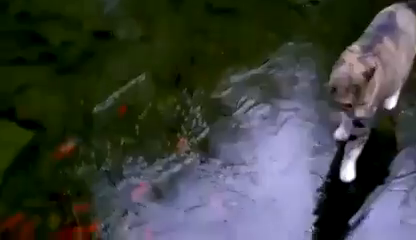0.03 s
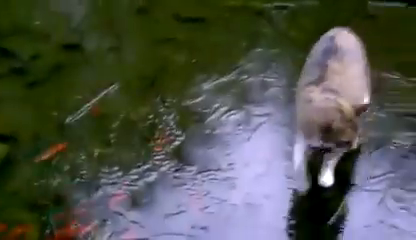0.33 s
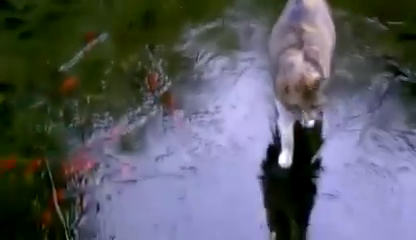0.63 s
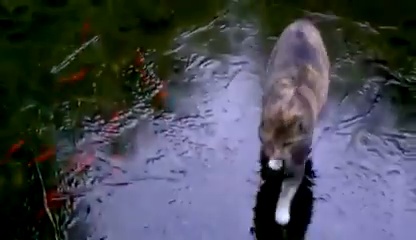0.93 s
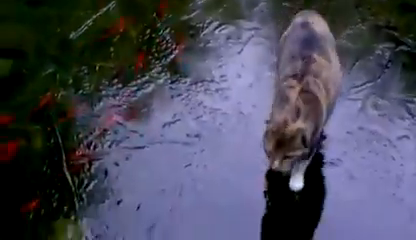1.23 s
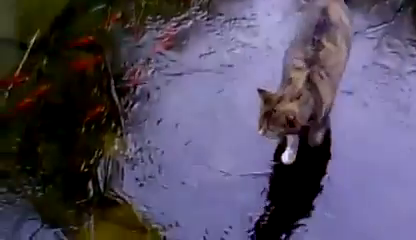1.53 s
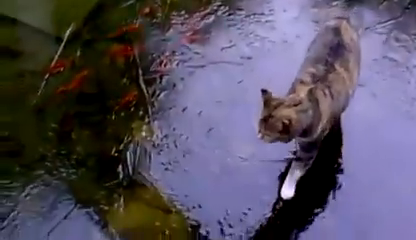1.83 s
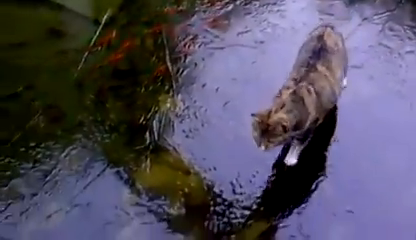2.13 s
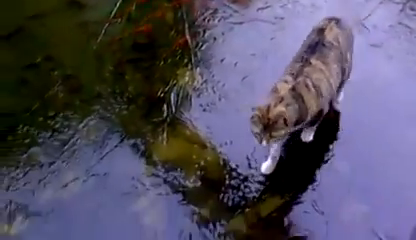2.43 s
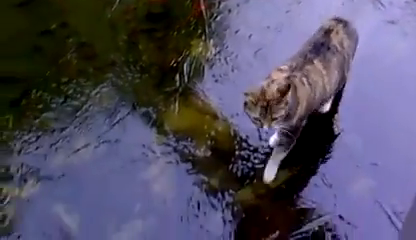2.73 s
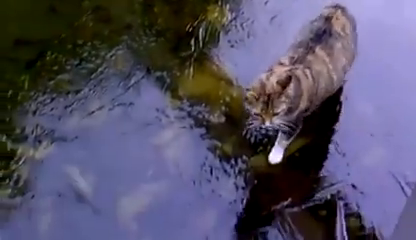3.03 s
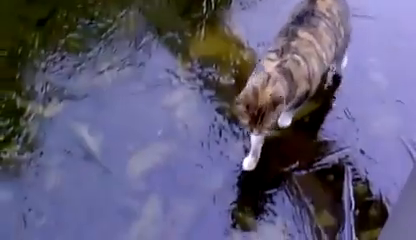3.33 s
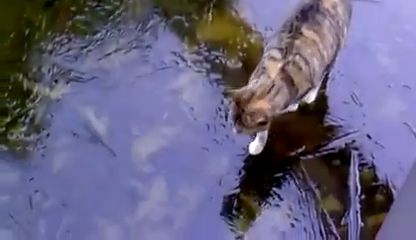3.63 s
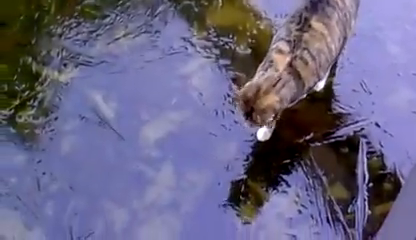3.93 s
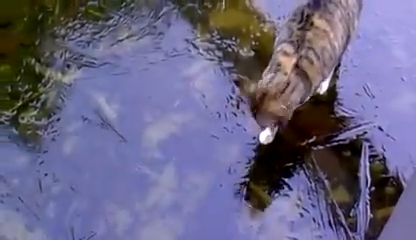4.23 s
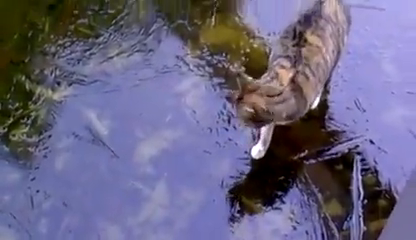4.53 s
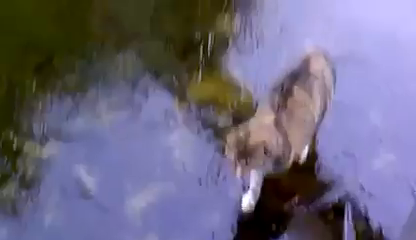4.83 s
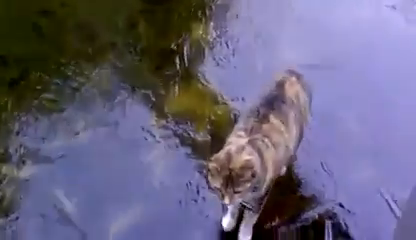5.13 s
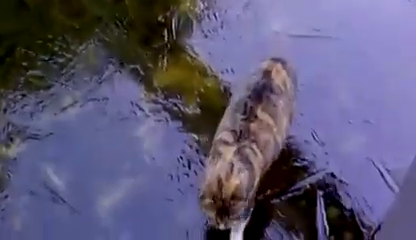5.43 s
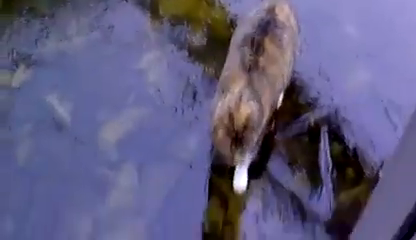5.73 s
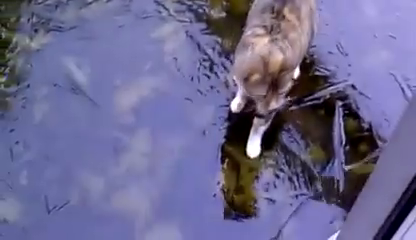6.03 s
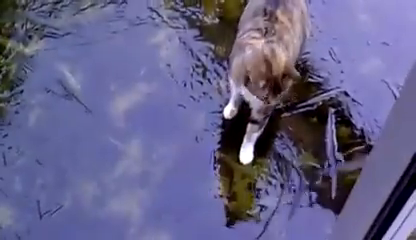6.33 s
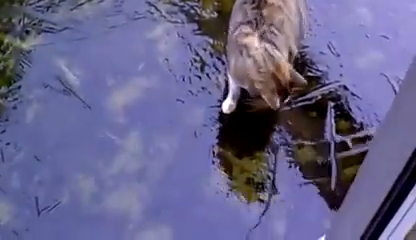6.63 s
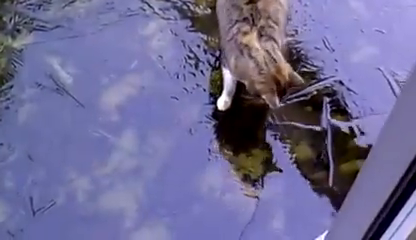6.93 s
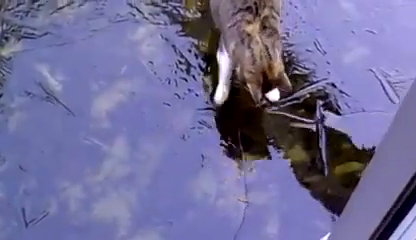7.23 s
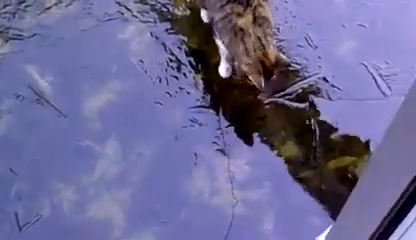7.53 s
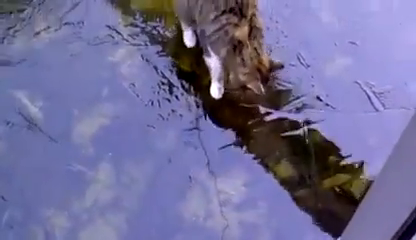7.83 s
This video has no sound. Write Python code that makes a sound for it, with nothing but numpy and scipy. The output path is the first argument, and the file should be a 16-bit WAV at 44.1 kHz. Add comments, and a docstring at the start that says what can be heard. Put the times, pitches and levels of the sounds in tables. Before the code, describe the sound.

A cat meows four times outdoors over faint air, and thin ice cracks sharply during the last, loudest meow.

```python
"""A frozen garden pond. A cat walks over it and meows four times: its vocal folds start raspy, then lock
into a clear arch of pitch while the mouth resonance sinks from "ee" to a closed hum, flaring on the way.
During the last meow the thin ice splits in two surges of tiny fractures, with a sharp zing and a
settling tail. Small ticks and paw scuffs come from the ice; faint air and a low drone lie underneath."""
import sys
import numpy as np
from scipy import signal
from scipy.fft import rfft, irfft, next_fast_len
from scipy.io import wavfile
from scipy.ndimage import uniform_filter1d

SR = 44100
rng = np.random.default_rng(int(sys.argv[2]) if len(sys.argv) > 2 else 0)


def digitize_waveform(pressure):
    """Quantize a signal to 16-bit integers and store it at the path in sys.argv[1].

    Rows of a 2-D input are taken as channels; values are limited to [-1, 1].
    """
    field = np.atleast_2d(pressure).T
    bounded = np.clip(field, -1, 1)
    quanta = np.round(bounded * 32767).astype(np.int16)
    wavfile.write(sys.argv[1], SR, quanta)


N = 355887
TIME = np.arange(N) / SR

# Contour of each meow:
# (time [s], pitch [Hz], mouth level [dB], mouth resonance [Hz], fundamental [dB], overtones [dB])
MEOW_1 = [(0.513, 852, -87, 2660, -83, -86), (0.599, 920, -71, 2160, -70, -73),
          (0.649, 917, -55, 2370, -56, -68), (0.687, 888, -58, 2110, -68, -63),
          (0.752, 924, -53, 1840, -57, -64), (0.8, 837, -47, 1350, -64, -62),
          (0.832, 823, -40, 1330, -64, -60), (0.855, 848, -60, 1640, -62, -61),
          (0.89, 864, -65, 1540, -53, -69), (0.971, 811, -57, 1780, -62, -68),
          (1.029, 856, -75, 1480, -55, -78), (1.055, 920, -81, 1400, -75, -72),
          (1.095, 870, -83, 1400, -79, -66), (1.162, 863, -85, 1400, -86, -80)]
MEOW_2 = [(1.784, 610, -72, 2330, -82, -74), (1.83, 800, -63, 2280, -74, -62),
          (1.925, 911, -59, 2200, -60, -64), (1.961, 967, -60, 2580, -68, -65),
          (2.043, 946, -60, 2730, -63, -62), (2.08, 941, -55, 2040, -62, -67),
          (2.183, 969, -72, 1990, -73, -84)]
MEOW_3 = [(2.95, 554, -69, 2320, -84, -76), (3.004, 691, -52, 2500, -66, -60),
          (3.037, 884, -55, 2960, -62, -63), (3.099, 948, -53, 3800, -59, -67),
          (3.16, 932, -49, 3200, -55, -61), (3.228, 889, -53, 2160, -58, -59),
          (3.257, 818, -45, 2100, -51, -54), (3.305, 743, -41, 1700, -51, -52),
          (3.332, 734, -28, 1400, -42, -47), (3.362, 772, -48, 1750, -53, -55),
          (3.418, 819, -61, 1580, -42, -72), (3.54, 813, -71, 1640, -55, -67),
          (3.66, 778, -74, 2150, -62, -70), (3.739, 743, -64, 2250, -60, -72),
          (3.788, 817, -67, 2110, -61, -85), (3.825, 840, -85, 1840, -77, -92)]
MEOW_4 = [(5.283, 674, -75, 2350, -82, -83), (5.294, 655, -53, 2020, -74, -66),
          (5.324, 690, -48, 2350, -59, -54), (5.368, 915, -54, 3150, -61, -64),
          (5.442, 868, -54, 2980, -70, -59), (5.489, 823, -47, 1650, -53, -55),
          (5.54, 793, -46, 1750, -55, -62), (5.556, 775, -26, 1380, -50, -48),
          (5.571, 780, -42, 1500, -54, -51), (5.599, 783, -49, 1620, -51, -54),
          (5.635, 768, -45, 1400, -33, -64), (5.75, 774, -70, 1400, -62, -79)]
# Character of each meow: (rasp length [s], subharmonic depth [0-1], upper resonance at usual pitch [Hz])
MEOW_CHARACTERS = [(.029, .3, 4600), (.1, .8, 4850), (.105, .55, 4550), (.115, .25, 4250)]
# EQ of the background noise that swells with the voice: (frequency [Hz], level [dB])
NOISE_SWELL_EQ = [(30, 2.5), (70, 12), (150, 0.5), (500, 0.5), (1500, -4.5), (4000, -2.5), (7000, -12),
                  (10000, -24.5)]

def cat(noise_swell_db=-14, noise_swell_growth=.74, usual_db=-48):
    """Four meows, with background noise that swells and sinks with their loudness."""
    contours = MEOW_1, MEOW_2, MEOW_3, MEOW_4
    voice = sum(meow(contour, *character) for contour, character in zip(contours, MEOW_CHARACTERS))
    power = np.maximum(uniform_filter1d(voice ** 2, size=2000), 0)
    loudness = np.sqrt(power) / from_db(usual_db)
    noise_gain = from_db(usual_db + noise_swell_db) * loudness ** noise_swell_growth
    return voice + noise_gain * noise(NOISE_SWELL_EQ)


def meow(contour, rasp_s, subharmonic, upper_hz, creak_db=-15):
    """The vocal folds beat unevenly at first, then lock into a clear tone."""
    span = (TIME >= contour[0][0]) & (TIME <= contour[-1][0])
    t = TIME[span]
    pitch, mouth_db, mouth_hz, fundamental_db, overtones_db = automation(contour, t)
    rasp = 1 / (1 + ((t - t[0]) / rasp_s) ** 6)
    jitter = (.007 + .005 * rasp) * drift(170, len(t))
    phase = 2 * np.pi * np.cumsum(pitch * (1 + jitter)) / SR
    overtones = vocal_tract(pitch, rasp, upper_hz, mouth_db, mouth_hz, overtones_db)
    tone = 0
    for k, gain in enumerate([from_db(fundamental_db), *overtones], 1):
        shimmer = 1 + (.12 + .045 * k + .25 * rasp) * drift(110, len(t))
        tone = tone + np.sqrt(2) * gain * shimmer * np.sin(k * phase)
    # loose folds alternate strong and weak cycles, each letting a turbulent puff into the throat
    growl = subharmonic * rasp
    tone = tone * (1 + growl * np.cos(phase / 2)) / np.sqrt(1 + growl ** 2)
    puffs = rng.standard_normal(len(t)) * (1 + np.cos(phase))
    creak = unit_rms(ring(puffs, hz=2900, width_hz=1700))
    out = np.zeros(N)
    out[span] = gate(t) * (tone + rasp * from_db(creak_db + mouth_db) * creak)
    return out


def vocal_tract(pitch, rasp, upper_hz, mouth_db, mouth_hz, overtones_db, usual_pitch_hz=850):
    """Gains of harmonics 2-11: the moving mouth picks out one or two, higher resonances carry the top."""
    hz = np.arange(2, 12)[:, None] * pitch
    flutter = from_db([1.8 * drift(14, len(pitch)) for _ in hz])
    mouth = bell(hz, mouth_hz, width_hz=.38 * mouth_hz)
    nose = from_db(-4) * bell(hz, 3250, width_hz=450)
    # the upper resonance partly tracks the pitch and sits lower during the rasp
    centre_hz = upper_hz * (pitch / usual_pitch_hz) ** .4 * (1 - .33 * rasp)
    upper = bell(hz, centre_hz, width_hz=1150) + nose
    mouth_gains = from_db(mouth_db) * unit_power(mouth * flutter)
    upper_gains = from_db(overtones_db) * unit_power(upper * flutter)
    return np.hypot(mouth_gains, upper_gains)


# EQ of the crack's three layers: (frequency [Hz], level [dB])
BODY_EQ = [(40, -8.5), (150, -2.5), (350, -7.5), (700, -1), (1200, -4), (2000, 1), (2950, 1.5), (3300, -23)]
CRUNCH_EQ = [(2700, -40.5), (3020, -16.5), (3150, -5.5), (3450, -1), (3900, -3.5), (4350, -1.5),
             (5000, -7.5), (5600, -23)]
SPLINTER_EQ = [(4600, -24.5), (5300, -2), (5900, -2), (6450, 2), (7100, -7), (7800, -8), (9100, -18.5),
               (10000, -28.5)]
# Their envelopes: (level [dB], lag [s], attack [s], release [dB/s], relative tail [dB], tail fall [dB/s])
BODY_ENV = (-30.7, -.001, .003, 240, -17, 110)
CRUNCH_ENV = (-17.3, .003, .011, 310, -21, 72)
SPLINTER_ENV = (-22.5, .001, .004, 290, -19, 88)

def crack():
    """The split runs through the sheet: body and splinters lead, the crunch follows."""
    layers = (BODY_ENV, BODY_EQ), (CRUNCH_ENV, CRUNCH_EQ), (SPLINTER_ENV, SPLINTER_EQ)
    return sum(surges(*envelope) * equalise(fractures(), eq) for envelope, eq in layers)


# Surges of the running crack: (time [s], relative level [dB], hold [s])
SURGES = [(5.610, 0, .021), (5.683, -8.5, .036)]

def surges(level_db, lag_s, attack_s, release_db_per_s, tail_db, tail_db_per_s):
    """Each surge rises, holds and dies quickly, leaving a slower tail as the ice settles."""
    power = 0
    for s, db, hold_s in SURGES:
        age = TIME - s - lag_s
        attack = np.clip(age / attack_s, 0, 1)
        released_s = np.clip(age - hold_s, 0, 2)
        fall = from_db(-release_db_per_s * released_s) + from_db(tail_db - tail_db_per_s * released_s)
        power = power + (from_db(db) * attack * fall) ** 2
    return from_db(level_db) * np.sqrt(power) / (1 + from_db(tail_db))


def fractures(per_s=7000, spread_db=2):
    """A dense crackle of tiny breaks of unequal size."""
    sizes = from_db(spread_db * np.minimum(rng.exponential(1, N), 4))
    polarity = rng.choice([-1, 1], N)
    return sizes * polarity * (rng.random(N) < per_s / SR)


# Long fractures zinging through the sheet: (time [s], peak [dB], start pitch [Hz], glide [s], attack [s])
ZINGS = [(5.6146, -3.8, 6870, 0.043, .0013), (5.6595, -17.5, 9300, .019, .003),
         (5.689, -17, 7770, .036, .003)]

def zings(grain=.29):
    """High bending waves outrun low ones in ice, so a fracture arrives as a quick falling whistle."""
    out = np.zeros(N)
    t = TIME[:SR // 20]
    for s, db, top_hz, glide_s, attack_s in ZINGS:
        phase = 2 * np.pi * np.cumsum(top_hz / (1 + t / glide_s) ** 2) / SR
        envelope = t * np.exp(-t / attack_s)
        grit = 1 + grain * drift(1200, len(t))
        place(out, envelope * np.sin(phase) * grit, s, db)
    return out


# Single fractures, ticks and paw scuffs: (time [s], peak [dB], centre [Hz], width [Hz], burst T60 [s])
SNAPS = [(.5950, -56, 5500, 2000, .01), (.6264, -32.5, 5600, 2800, 0.0058),
         (.6267, -37.5, 1980, 2200, 0.017), (1.738, -64, 90, 120, 0.053), (2.813, -44.5, 1980, 1200, 0.14),
         (4.610, -44.5, 600, 250, .05), (4.611, -51, 1120, 300, .05), (5.11, -55, 3800, 900, 0.24),
         (5.618, -13, 7100, 1090, .02), (5.6265, -8.5, 3630, 700, 0.034), (5.6325, -12, 3500, 700, .014),
         (5.639, -8, 4150, 1190, 0.014), (5.6635, -13, 6000, 1200, 0.011), (5.856, -45, 6200, 1480, 0.011),
         (5.9175, -36.5, 6800, 597, 0.011), (5.929, -43.5, 3670, 603, .03), (6.759, -53, 820, 700, 0.063),
         (8.04, -54.5, 470, 600, 0.055)]

def snaps():
    """Each snap is a short dying burst that rings a patch of ice."""
    out = np.zeros(N)
    for s, db, hz, width_hz, t60 in SNAPS:
        place(out, ring(burst(t60, length_s=.25), hz, width_hz), s, db)
    return out


# Soft strokes on the ice: (crest time [s], half length [s], level [dB])
SCRAPES = [(6.75, .35, -67), (7.6, .5, -71)]
# Their EQ: (frequency [Hz], level [dB])
SCRAPE_EQ = [(3200, -14), (4400, 0), (5600, -12)]

def scrapes():
    """Fine grains of ice rubbed in slow, soft strokes."""
    strokes = sum(from_db(db) * swell(s, half_s) for s, half_s, db in SCRAPES)
    return strokes * equalise(fractures(), SCRAPE_EQ)


# EQ of the air bed's low rush and thin hiss: (frequency [Hz], level [dB])
RUSH_EQ = [(25, -10), (45, -4.5), (66, 0.5), (82, -6.5), (100, -3.5), (160, -8), (256, -9.5), (444, -10.5),
           (640, -12.5), (1100, -12.5), (1300, -15.5), (2000, -15.5), (3200, -28.5)]
HISS_EQ = [(1530, -29.5), (2600, -5), (3190, -4), (4410, -3.5), (7100, -7.5), (8760, -13.5), (9590, -21),
           (10100, -33), (13100, -51), (22000, -120)]
# Slow swells of the bed: (crest time [s], half length [s], rush lift [dB], hiss lift [dB])
AIR_SWELLS = [(.72, .18, 4.5, 3.5), (1.9, .2, 2.5, 1.5), (3.42, .27, 6, 3.7), (5.78, .21, 10, 3.5),
              (6.78, .42, 1, 5.6), (8.0, .7, 1.7, 4.2)]

def air(rush_db=-61.4, hiss_db=-69.5, drone_db=-11.5, full_at_s=.63, fade_db_per_s=100):
    """A distant outdoor rush with a low drone in it, and a swishing hiss; both fade in and swell."""
    for s, half_s, rush_lift_db, hiss_lift_db in AIR_SWELLS:
        rush_db = rush_db + rush_lift_db * swell(s, half_s)
        hiss_db = hiss_db + hiss_lift_db * swell(s, half_s)
    drone = unit_rms(ring(rng.standard_normal(N), hz=72, width_hz=16))
    swish_db = .7 * drift(10, N)
    hiss = from_db(hiss_db + swish_db) * noise(HISS_EQ)
    rush = from_db(rush_db) * (noise(RUSH_EQ) + from_db(drone_db) * drone)
    fade_in = from_db(fade_db_per_s * np.minimum(TIME - full_at_s, 0))
    return fade_in * (rush + hiss)


# Early reflections off the ice and the pond edge: (delay [s], level [dB])
ECHOES = [(.017, -18.5), (.034, -23), (.058, -23.5)]

def garden(x, tail_db, tail_t60):
    """Open-air space: a few weak echoes and a short scattered tail."""
    tail = burst(tail_t60, length_s=.5)
    wet = signal.fftconvolve(x, tail / np.linalg.norm(tail))[:N]
    echoes = sum(from_db(db) * np.interp(TIME - delay, TIME, x, left=0) for delay, db in ECHOES)
    return x + echoes + from_db(tail_db) * wet


def from_db(db):
    """Decibels to gain."""
    return 10 ** (np.asarray(db) / 20)


def unit_rms(x):
    """Normalise to rms 1."""
    return x / np.sqrt(np.mean(x ** 2) + 1e-20)


def unit_power(gains):
    """Scale harmonic gains so that their powers add up to 1."""
    return gains / np.sqrt(np.sum(gains ** 2, axis=0))


def automation(rows, t):
    """Each lane of a breakpoint table at the times t."""
    times, *lanes = np.transpose(rows)
    return [np.interp(t, times, lane) for lane in lanes]


def gate(t, fade_s=.004):
    """Open across t, with a short fade at each end."""
    return np.clip(np.minimum(t - t[0], t[-1] - t) / fade_s, 0, 1)


def swell(crest_s, half_s):
    """A smooth rise and fall, 1 at the crest."""
    return np.exp(-((TIME - crest_s) / half_s) ** 2)


def drift(rate_hz, size):
    """Random modulation up to about rate_hz; rms 1."""
    hz = np.fft.rfftfreq(size, 1 / SR)
    return unit_rms(irfft(rfft(rng.standard_normal(size)) / (1 + (hz / rate_hz) ** 2), size))


def equalise(x, eq):
    """Shape a steady source with an EQ curve that rolls off past its ends; rms 1."""
    size = next_fast_len(N)
    hz = np.maximum(np.fft.rfftfreq(size, 1 / SR), 1)
    points, db = np.transpose(eq)
    curve = from_db(np.interp(np.log(hz), np.log(points), db))
    skirts = np.minimum(1, np.minimum(hz / points[0], points[-1] / hz)) ** 8
    return unit_rms(irfft(rfft(x, size) * curve * skirts, size)[:N])


def noise(eq):
    """Steady noise through an EQ curve."""
    return equalise(rng.standard_normal(N), eq)


def burst(t60, length_s):
    """A noise hit that falls 60 dB in t60 seconds."""
    t = TIME[:round(length_s * SR)]
    return rng.standard_normal(len(t)) * from_db(-60 * t / t60)


def ring(x, hz, width_hz):
    """Two resonators in series, the second twice as wide."""
    for width in width_hz, 2 * width_hz:
        r = np.exp(-np.pi * width / SR)
        poles = [1, -2 * r * np.cos(2 * np.pi * hz / SR), r * r]
        x = signal.lfilter(np.array([1, 0, -1]) * (1 - r * r) / 2, poles, x)
    return x


def bell(hz, centre_hz, width_hz):
    """Gain of a resonance, 1 at its centre."""
    return 1 / (1 + ((hz - centre_hz) / width_hz) ** 2) ** 2


def place(track, hit, at_s, peak_db):
    """Mix a hit into the track at a given time and peak level."""
    start = round(at_s * SR)
    track[start:start + len(hit)] += (from_db(peak_db) * hit / np.abs(hit).max())[:N - start]


def scene():
    """Mono mix: cat and ice in the garden, over the air bed and soft scrapes."""
    voice = garden(cat(), tail_db=-13, tail_t60=.3)
    ice = garden(crack() + zings() + snaps(), tail_db=-19, tail_t60=.1)
    return (voice + ice + air() + scrapes())[None]


def record(dry):
    """A steep high cut at 10 kHz."""
    return signal.sosfilt(signal.ellip(10, .3, 70, 10000, fs=SR, output="sos"), dry)


dry = scene()
out = record(dry)
digitize_waveform(out)
```